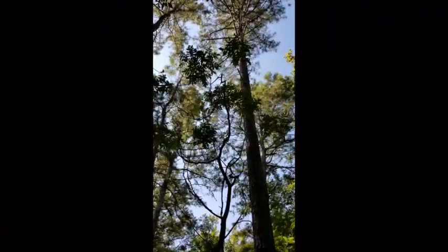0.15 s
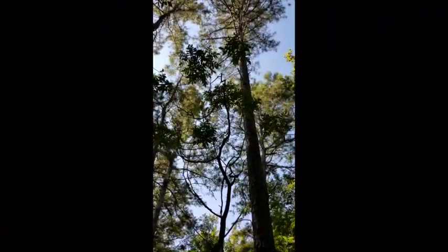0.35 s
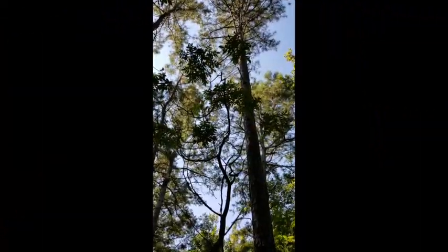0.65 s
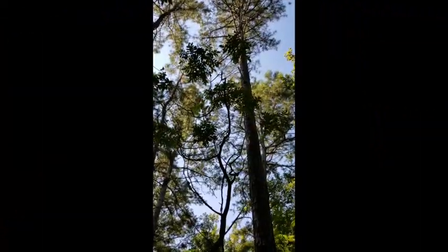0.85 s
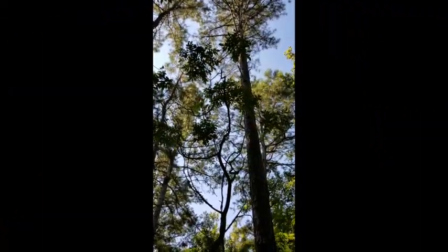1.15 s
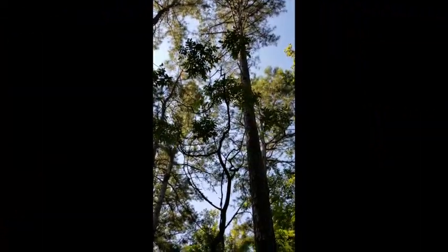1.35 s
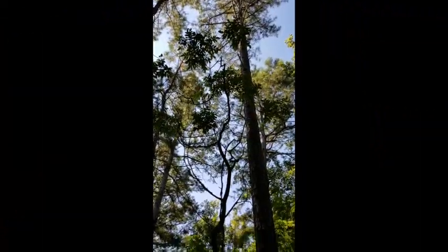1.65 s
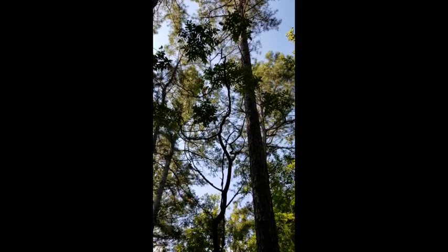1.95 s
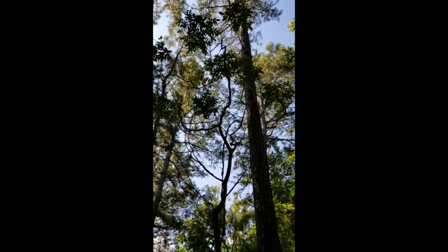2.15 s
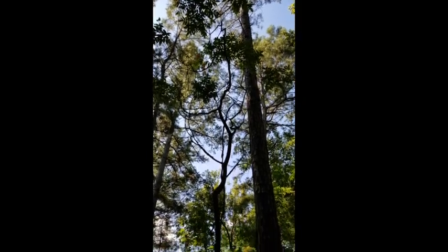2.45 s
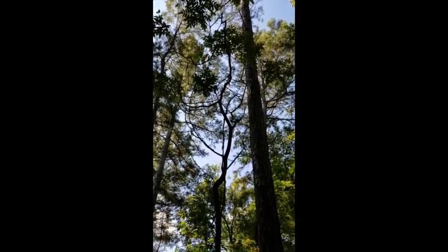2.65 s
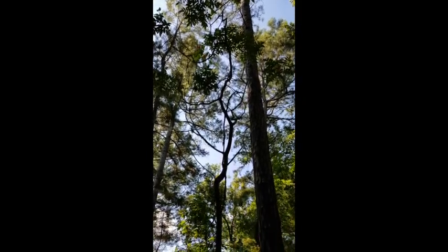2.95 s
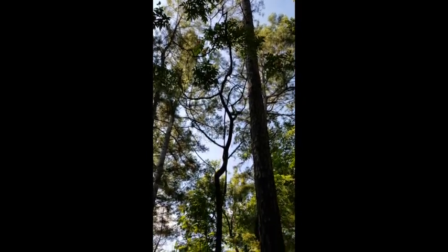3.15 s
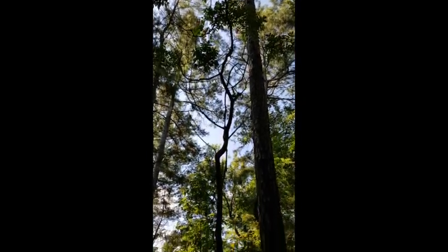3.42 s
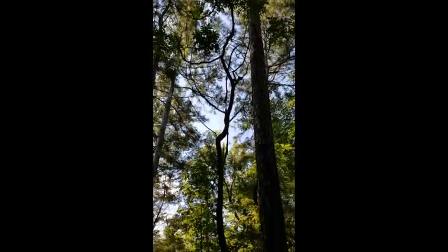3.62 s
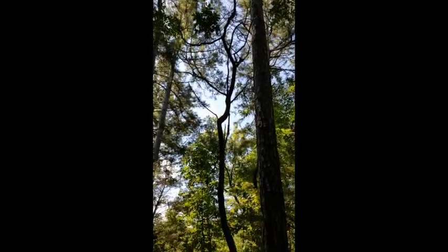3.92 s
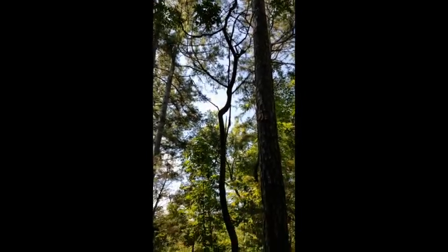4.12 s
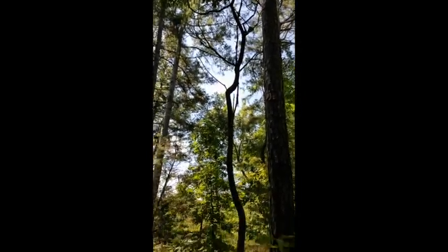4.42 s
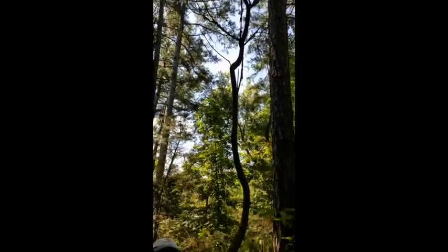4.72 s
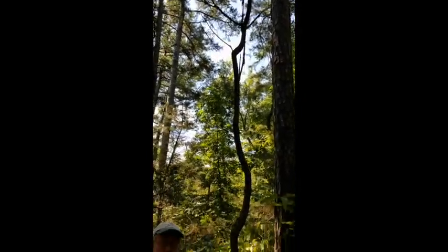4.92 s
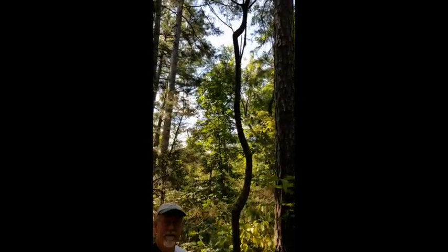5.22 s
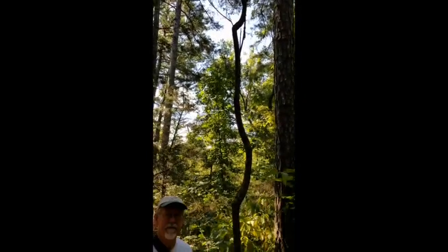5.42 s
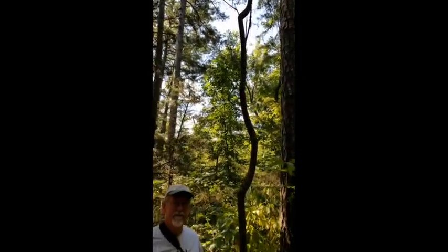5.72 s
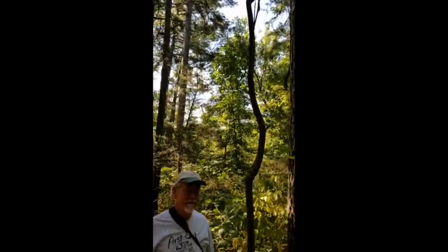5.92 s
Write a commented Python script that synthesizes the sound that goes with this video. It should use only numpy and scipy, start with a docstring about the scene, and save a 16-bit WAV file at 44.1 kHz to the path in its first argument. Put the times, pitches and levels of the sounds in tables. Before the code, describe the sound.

A steady wall of insects fills a summer wood for about 6 seconds. Many crickets trill around 6.5 kHz, with individual fast pulsing trains swelling and fading; katydids add a smooth, brighter hiss above 9 kHz, stronger on the left, with rapid buzzing pulses around 2.5 s. A faint, wavering cicada drone on the right stops abruptly at 1.25 s. The hand holding the microphone makes small dry ticks from 0.3 to 0.7 s, with the heaviest dull thud at 0.56 s on the right, more ticks at 1.0 s and a faint cluster near 3.0 s. Distant, blurred birds call very softly around 0.7, 1.9, 2.1, 2.7 and 4.3 s. Quiet woodland air, slight breeze and low rumble surges lie underneath, one surge at 4.1 s. From 5.6 s the grip rustles with ticks and soft thuds, ending in tiny crisp snaps near 5.95 s. A man appears late but no speech sounds.

```python
"""A crowd of crickets trills near 6.5 kHz and katydids hiss above 9 kHz, single singers pulsing among them, in a summer wood.
Crowds are noise through wing resonances; near crickets are trains of short notes, single katydids pulsed noise.
A far cicada (wavering noise band) stops after 1.2 s; far birds call as blurred gliding tones.
A hand on the microphone case adds ticks, snaps and thuds (dying rings), the heaviest thud near 0.56 s,
and a rustle of the grip in the last half second. Air, breeze and a low rumble surging at jolts are coloured noise."""
import sys
import numpy as np
from scipy import signal
from scipy.fft import rfft, irfft, next_fast_len
from scipy.io import wavfile

SR = 44100
rng = np.random.default_rng(int(sys.argv[2]) if len(sys.argv) > 2 else 0)


def wav_out(sig):
    """Save sig, one row per channel (or a flat mono array), as 16-bit PCM at SR to the path in sys.argv[1]."""
    wavfile.write(sys.argv[1], SR, np.round(np.clip(np.atleast_2d(sig).T, -1, 1) * 32767).astype(np.int16))


N = 267466


def amp(db):
    """dB to gain."""
    return 10 ** (np.asarray(db) / 20)


def rms_one(x):
    """Scale to rms 1 over all its values."""
    return x / np.sqrt(np.mean(x ** 2) + 1e-20)


def in_time(rows):
    """Gain, then any further columns, one value per sample; silent outside the table."""
    s, level_db, *rest = np.transpose(rows)
    t = np.arange(N) / SR
    gain = amp(np.interp(t, s, level_db, left=-150, right=-150))
    return [gain] + [np.interp(t, s, column) for column in rest]


def panned(pan_db):
    """Left and right gains for an L-R difference in dB; total power stays fixed."""
    ratio = amp(np.atleast_1d(pan_db))
    return 2 * np.array([ratio, np.ones_like(ratio)]) / np.sqrt(1 + ratio ** 2)


def stereo_noise():
    """White noise, independent left and right."""
    return rng.standard_normal((2, N))


def coloured(x, spectrum, side=((1, 0), (2, 0))):
    """Filter two channels, tilted between the ears by frequency; their powers are equal and sum to 1."""
    size = next_fast_len(N)
    log_hz = np.log(np.arange(size // 2 + 1) * SR / size + 1e-9)

    def curve_db(rows, **ends):
        hz, db = np.transpose(rows)
        return np.interp(log_hz, np.log(hz), db, **ends)

    tilt_db = curve_db(side) * [[.5], [-.5]]
    gain = amp(curve_db(spectrum, left=-150, right=-150) + tilt_db)
    filtered = irfft(rfft(x, size) * gain, size)[:, :N]
    return np.array([rms_one(channel) for channel in filtered]) / np.sqrt(2)


def drift(corner_hz):
    """Slow chance: noise twice through a one-pole low-pass, spread 1."""
    step = 40   # samples between slow values
    r = np.exp(-2 * np.pi * corner_hz * step / SR)
    slow = signal.lfilter([1], [1, -2 * r, r * r], rng.standard_normal(N // step + 2002))
    slow = rms_one(slow[2000:])   # drop the filter's start
    return np.interp(np.arange(N) / step, np.arange(len(slow)), slow)


def swell(peak_s, peak_db, rise_db_per_s, fall_db_per_s):
    """Gain that climbs to a peak and sinks again, both at a steady rate in dB."""
    late_s = np.arange(N) / SR - peak_s
    return amp(peak_db + np.minimum(rise_db_per_s * late_s, -fall_db_per_s * late_s))


def chorus(rows, wings, side, strokes, sharp, flicker_db):
    """Countless file-tooth impacts blend to noise in the wing resonance; the nearest singers make it throb."""
    level, pan_db = in_time(rows)
    throb_db = np.array([flicker_db * drift(35), flicker_db * drift(24)])
    for per_s, wander, left_db, right_db in strokes:
        pace = per_s * (1 + wander * drift(2.1))
        turn = 2 * np.pi * (np.cumsum(pace) / SR + rng.random())
        stroke = np.cos(turn) + sharp * np.cos(2 * turn)   # a stroke is shorter than its pause
        come_and_go = amp(5.2 * drift(1.0))
        throb_db += np.array([[left_db], [right_db]]) * stroke * come_and_go
    teeth = stereo_noise() * amp(throb_db)
    return level * panned(pan_db) * coloured(teeth, wings, side)


# Cricket crowd level. Each row: time in seconds, level in dB, L-R in dB.
CRICKET_LEVEL = [(0, -44, -2), (1, -42.5, -2), (2.2, -43.5, -2), (2.8, -43, -2), (3.1, -44, -1),
                 (4, -43.5, -1), (5, -44, -0.8), (6.07, -43.5, 4)]
# Cricket wing resonance. Each row: frequency in Hz, relative density in dB per Hz.
CRICKET_WINGS = [(5250, -81), (5500, -24.5), (5800, -9), (6050, -2.5), (6250, 3), (6400, 2), (6560, 2.5),
                 (6800, 1), (6900, -1.5), (6980, -1), (7150, -3), (7300, -9), (7420, -7.5), (7550, -11.5),
                 (8000, -10), (8230, -23), (8500, -56)]
# Uneven spread of pitches between the ears. Each row: frequency in Hz, extra L-R in dB.
CRICKET_SIDE = [(5500, 3), (6000, 1.2), (6300, -2), (6800, -3.5), (7050, 4.5), (7400, 2), (8000, 2.5)]
# Faint common throb. Each row: strokes per s, wander as a fraction, depth left in dB, depth right in dB.
CRICKET_STROKES = [(15.4, 0.01, 0.03, 0.25), (30.6, 0.01, 0.2, 0.08)]


def cricket_crowd():
    """The far crowd: tooth-impact noise in the wing resonance."""
    return chorus(CRICKET_LEVEL, CRICKET_WINGS, CRICKET_SIDE, CRICKET_STROKES, sharp=0.093, flicker_db=1.0)


STROKE_SAG_HZ, STROKE_SPREAD_DB = 60.4, 0.5


def cricket(hz, per_s, turn, share, pan_db):
    """Each wing stroke is a short pure note whose pitch sags; strokes come at a steady pace."""
    length = int(share / per_s * SR)
    u = np.arange(length) / length
    centres_s = (np.arange(1, int(per_s * N / SR) + 2) - turn % 1) / per_s
    starts = (centres_s * SR).astype(int) + SR - length // 2   # after 1 s of padding
    phase_chance = rng.standard_normal((len(starts), 2))
    loud_chance = rng.standard_normal((len(starts), 1))
    turns = (hz * u + STROKE_SAG_HZ * (u - u * u) / 2) * length / SR
    out = np.zeros((2, N + 2 * SR))
    for ear in (0, 1):
        note = np.sin(2 * np.pi * (turns + phase_chance[:, [ear]])) * np.sin(np.pi * u) ** 2
        out[ear, starts[:, None] + np.arange(length)] = note * amp(STROKE_SPREAD_DB * loud_chance)
    return panned(pan_db) * rms_one(out[:, SR:SR + N]) / np.sqrt(2)


NEAR_COUNT, NEAR_HZ, NEAR_SPREAD_HZ = 30, 6514, 124.6
NEAR_SLOWEST_PER_S, NEAR_FASTEST_PER_S = 14.6, 16.4   # before doubling
NEAR_RE_CROWD_DB, NEAR_SPAN_DB = -2.5, 8.5


def near_crickets():
    """A few dozen singers, each with its own pitch, pace, place and loudness; some stroke twice as fast."""
    out = np.zeros((2, N))
    for pitch, speed, turn, place, loud, kind in rng.random((NEAR_COUNT, 6)):
        hz = NEAR_HZ + NEAR_SPREAD_HZ * np.log((pitch + .05) / (1.05 - pitch))
        pace = 2 if kind > .6 else 1
        per_s = pace * (NEAR_SLOWEST_PER_S + (NEAR_FASTEST_PER_S - NEAR_SLOWEST_PER_S) * speed)
        voice = cricket(hz, per_s, turn, share=.2 * (1 + pace), pan_db=20 * (place - .5))
        out += amp(NEAR_SPAN_DB * loud) * voice
    return rms_one(out) * amp(NEAR_RE_CROWD_DB) * in_time(CRICKET_LEVEL)[0]


# Crickets that stand out. Each row pairs a voice: wing pitch in Hz, strokes per s, turn at start in cycles,
# sounding share of a turn, L-R in dB; with a swell: peak in seconds, level in dB, rise and fall in dB per s.
SOLO_CRICKETS = [((7190, 15.035, -.2, .3, -4), (4.3, -58.5, .4, 6)), ((7400, 41.43, -.88, .55, 12),
                 (5.1, -60.5, 1.3, 3)), ((6260, 15.74, -.05, .3, -9), (2.5, -55.5, 1, 1.5)),
                 ((6370, 30.46, .2, .45, -9), (1.6, -55.5, 3, 1.5)), ((6630, 15.38, .13, .3, -10),
                 (3.4, -55, 1.5, 2)), ((6390, 30.7, -.08, .45, 9), (4.5, -56, 1, 2))]


def solo_crickets():
    """Single trains of wing notes, each swelling and fading once."""
    return sum(swell(*loudness) * cricket(*voice) for voice, loudness in SOLO_CRICKETS)


# Katydid crowd level. Each row: time in seconds, level in dB, L-R in dB.
KATYDID_LEVEL = [(0, -41.5, 8.6), (.5, -42.5, 8.9), (1.3, -41, 7.4), (2, -42.5, 8.8), (2.7, -41, 8.4),
                 (3.3, -43, 8.3), (3.9, -42, 9.3), (5, -43.5, 9.7), (6.07, -43, 8.3)]
# Katydid wing resonance. Each row: frequency in Hz, relative density in dB per Hz.
KATYDID_WINGS = [(8500, -85), (8900, -61), (9100, -24.5), (9800, -13.5), (11300, -9.5), (12900, -2),
                 (14800, 1.5), (15700, 0), (16500, -8.5)]
# Uneven spread of pitches between the ears. Each row: frequency in Hz, extra L-R in dB.
KATYDID_SIDE = [(9000, -8), (10000, -6.5), (11000, -4), (12200, 0), (14500, 2), (15700, 3)]
# Faint common throb. Each row: strokes per s, wander as a fraction, depth left in dB, depth right in dB.
KATYDID_STROKES = [(26.0, 0.02, 0.25, 0.25), (17.6, 0.051, 0.08, 0.08)]


def katydid_crowd():
    """A hiss: tooth-impact noise in a broad, high wing resonance."""
    return chorus(KATYDID_LEVEL, KATYDID_WINGS, KATYDID_SIDE, KATYDID_STROKES, sharp=0.26, flicker_db=0.8)


# Katydids that stand out. Each row pairs a voice: wing pitch in Hz, width in Hz, strokes per s, turn at start
# in cycles, sounding share of a turn, L-R in dB; with a swell: peak in seconds, level in dB, rise and fall in dB per s.
SOLO_KATYDIDS = [((9900, 700, 58.57, .3, .45, 12), (1.3, -67, 5, 35)), ((13900, 2600, 26.09, -.4, .4, 12),
                 (2.5, -52.5, 1.5, 9)), ((14600, 1800, 36.42, 0, .45, 14), (2.8, -56, 5.5, 8))]


def solo_katydids():
    """Each wing stroke is a short burst of tooth impacts in one wing resonance, at a steady pace."""
    t, out = np.arange(N) / SR, np.zeros((2, N))
    for (hz, width_hz, per_s, turn, share, pan_db), loudness in SOLO_KATYDIDS:
        away = np.abs((per_s * t + turn + .5) % 1 - .5)   # turns from the middle of the nearest stroke
        stroke = np.cos(np.pi * np.minimum(away / share, .5)) ** 2
        wing = [(hz - width_hz, -40), (hz - width_hz / 2, -3), (hz, 0),
                (hz + width_hz / 2, -3), (hz + width_hz, -40)]
        buzz = coloured(stereo_noise(), wing) * rms_one(stroke)
        out += swell(*loudness) * panned(pan_db) * buzz
    return out


EDGE_HZ, EDGE_T60_S = 1400, .004   # higher mode of the case


def blows(rows, cycles, sag, tail_db, tail_s, edge_db=-99):
    """A ring swells within a cycle, sags in pitch and dies 60 dB in `cycles`; edge mode and gritty tail join it."""
    out, t = np.zeros((2, N)), np.arange(SR // 5) / SR
    for start, peak_db, hz, pan_db in rows:
        turn = hz * (t + sag * 0.0044 * (1 - np.exp(-t / 0.0027)))
        ring = np.sin(2 * np.pi * turn) * (1 - np.exp(-2 * turn)) * amp(-60 * t * hz / cycles)
        edge = np.sin(2 * np.pi * EDGE_HZ * t) * (1 - np.exp(-EDGE_HZ * t)) ** 2 * amp(-60 * t / EDGE_T60_S)
        ring += amp(edge_db) * edge
        band_hz = [hz * .6, min(hz * 1.4, SR * .45)]
        band = signal.butter(2, band_hz, "band", fs=SR, output="sos")
        grit = rms_one(signal.sosfilt(band, rng.standard_normal((2, len(t)))))
        blow = ring / np.abs(ring).max() + amp(tail_db - 60 * t / tail_s) * grit
        i = int(start * SR)
        out[:, i:i + len(t)] += (amp(peak_db) * panned(pan_db) * blow)[:, :N - i]
    return out


# Finger ticks on the case. Each row: start in seconds, ring peak in dB before panning, centre in Hz, L-R in dB.
TICKS = [(.3055, -52, 770, -17), (.321, -60, 577, -17), (.4685, -51.5, 830, -17), (.544, -53, 754, -24),
         (.5588, -41, 496, -35), (.5618, -48, 1010, -28), (.5897, -44, 810, -31), (.6045, -53.5, 447, -21),
         (.664, -55, 845, -20), (1.0016, -52.5, 1000, -23), (1.012, -50.5, 686, -23),
         (1.0343, -46.5, 854, -28), (1.2355, -60, 765, -15), (1.9655, -55, 1040, 0),
         (2.9245, -58, 560, -19), (2.9385, -52, 537, -15), (2.957, -70, 620, -18), (2.97, -62, 540, -18),
         (2.989, -61, 540, -18), (3.0225, -63, 600, -20), (3.0277, -55.5, 570, -22),
         (3.0533, -62.5, 540, -19), (5.5945, -66, 322, -10), (5.7055, -54, 296, -12),
         (5.7525, -59, 286, -15), (5.7535, -48.5, 930, -13), (5.818, -58, 397, -8), (5.836, -58, 350, -13),
         (5.866, -59, 604, -16), (5.878, -57, 500, -10), (5.893, -64, 500, -17), (5.909, -59, 350, -6),
         (5.928, -72, 317, -7)]


def finger_ticks():
    """Short case rings with a bright edge and a gritty tail; polarity inverted."""
    return -blows(TICKS, cycles=3.8, sag=0.0041, tail_db=-18.5, tail_s=0.21, edge_db=-9.0)


# Twig-like snaps. Each row: start in seconds, ring peak in dB before panning, centre in Hz, L-R in dB.
SNAPS = [(5.9522, -47, 5600, 10), (5.9523, -43, 8600, 4), (5.9548, -52, 4900, 10), (5.9885, -45, 2100, -7),
         (5.9883, -43, 4600, 9)]


def snaps():
    """Bright rings that die in milliseconds; polarity inverted."""
    return -blows(SNAPS, cycles=7, sag=0.0091, tail_db=-21, tail_s=0.1)


# Dull thuds of the whole case. Each row: start in seconds, ring peak in dB before panning, ring in Hz, L-R in dB.
THUDS = [(.5595, -37, 64.6, -24), (5.097, -51, 93, -32), (.04, -50, 77, -17), (1.615, -53.5, 75, -9),
         (5.817, -48, 69.4, -9), (5.864, -47, 72.4, -23), (5.907, -51, 62, -21)]


def case_thuds():
    """Low case rings whose pitch sags strongly at the onset."""
    return blows(THUDS, cycles=6.6, sag=1.0, tail_db=-56, tail_s=.1)


# The grip shifts. Each row: time in seconds, level in dB.
RUSTLE_LEVEL = [(5.57, -85), (5.6, -57), (5.645, -67), (5.665, -74), (5.7, -68), (5.74, -65), (5.765, -57),
                (5.795, -66), (5.834, -60), (5.858, -59), (5.92, -56), (5.95, -61), (5.98, -63),
                (6.07, -66)]
# Rustle spectrum. Each row: frequency in Hz, relative density in dB per Hz.
RUSTLE_COLOUR = [(100, 10.5), (200, 7), (400, -4), (600, -15), (1000, -8), (1800, -14.5), (3000, -36),
                 (5500, -13)]


def grip_rustle():
    """The shifting grip: coloured noise with a fast random flicker."""
    noise = stereo_noise() * amp(1.4 * drift(60))
    return in_time(RUSTLE_LEVEL)[0] * panned(-9) * coloured(noise, RUSTLE_COLOUR)


# Surges of the rumble. Each row: time in seconds, peak in dB.
JOLTS = [(.045, -58.5), (.41, -66), (.62, -68), (.9, -60), (1.62, -65), (2.3, -64), (2.46, -60),
         (2.66, -57), (2.93, -63), (3.24, -69), (3.38, -64.5), (3.75, -65.5), (3.93, -68), (4.14, -54.5),
         (4.58, -67.5), (4.89, -67), (5.0, -62.5), (5.11, -63.5), (5.44, -57.5), (5.68, -59), (5.88, -53)]
# Rumble spectrum. Each row: frequency in Hz, relative density in dB per Hz.
RUMBLE_COLOUR = [(12, -65), (24, -18), (41, -5.5), (65, 6), (81, 2), (172, -17.5), (247, -29), (300, -17),
                 (390, -38), (660, -120)]
RUMBLE_BED_DB, RUMBLE_LUMPY_DB, RUMBLE_LUMP_CORNER_HZ = -68, 2, 2.1
RUMBLE_PAN_DB, RUMBLE_SHARED_POWER = -1.5, 0.69
JOLT_RISE_DB_PER_S, JOLT_FALL_DB_PER_S = 212, 140


def rumble():
    """Lumpy low noise, partly shared by the two microphone ports; it surges when the hand jolts."""
    shared, own = rng.standard_normal(N), stereo_noise()
    noise = np.sqrt(RUMBLE_SHARED_POWER) * shared + np.sqrt(1 - RUMBLE_SHARED_POWER) * own
    level = amp(RUMBLE_BED_DB + RUMBLE_LUMPY_DB * drift(RUMBLE_LUMP_CORNER_HZ))
    level += sum(swell(s, db, JOLT_RISE_DB_PER_S, JOLT_FALL_DB_PER_S) for s, db in JOLTS)
    return level * panned(RUMBLE_PAN_DB) * coloured(noise, RUMBLE_COLOUR)


# Far cicada, breaking off. Each row: time in seconds, level in dB.
CICADA_LEVEL = [(0, -72), (.15, -71), (.3, -72.5), (.5, -70.5), (.65, -68.5), (1.0, -70.5), (1.2, -69.5),
                (1.235, -68), (1.26, -77), (1.28, -90)]
# Drone spectrum. Each row: frequency in Hz, relative density in dB per Hz.
CICADA_BAND = [(3150, -24), (3350, 6), (3520, 8), (3800, 4), (4050, 2), (4300, -5), (4700, -9)]
# Two last clicks. Each row: start in seconds, ring peak in dB before panning, centre in Hz, L-R in dB.
CICADA_CLICKS = [(1.2332, -56, 3650, -20), (1.2368, -58, 3550, -20)]
CICADA_WAVER_DB, CICADA_WAVER_CORNER_HZ = 0.5, 8.8


def cicada():
    """A narrow noise band with a randomly wavering level stops near two short rings."""
    level = in_time(CICADA_LEVEL)[0] * amp(CICADA_WAVER_DB * drift(CICADA_WAVER_CORNER_HZ))
    drone = level * panned(-20.0) * coloured(stereo_noise(), CICADA_BAND)
    return drone + blows(CICADA_CLICKS, cycles=14.0, sag=0.005, tail_db=-30.0, tail_s=0.05)


# Far calls, blurred by the trees. Each row: start in seconds, length in seconds, pitch in Hz at start, middle
# and end, width in Hz, level in dB, L-R in dB.
BIRD_CALLS = [(.735, .055, 2450, 2350, 2300, 120, -72.5, -7), (.74, .12, 2700, 2850, 2800, 400, -73.5, -7),
              (.79, .05, 2500, 2480, 2500, 120, -78, -6), (.85, .11, 2850, 2700, 2750, 400, -79, -7),
              (.69, .08, 4000, 4050, 3950, 300, -75, 10), (2.13, .34, 1500, 1560, 1480, 320, -77.5, 0),
              (2.74, .16, 2800, 2520, 2900, 200, -78, -4), (2.69, .24, 2650, 2850, 2750, 400, -80, -3),
              (1.885, .04, 5780, 5760, 5740, 150, -66, -14), (4.23, .06, 4380, 4350, 4300, 140, -79, 5),
              (4.24, .13, 4750, 4800, 4880, 220, -77.5, 4), (4.3, .14, 4500, 4600, 4650, 320, -74.5, 3),
              (4.33, .14, 4180, 4280, 4330, 160, -77, 3)]
BIRD_FLUTTER_DB, BIRD_FLUTTER_CORNER_HZ = 2, 30


def birds():
    """Each call is a gliding tone whose many echoes scramble it into a narrow band."""
    out = np.zeros((2, N))
    flutter = amp(BIRD_FLUTTER_DB * drift(BIRD_FLUTTER_CORNER_HZ))
    for start, length, hz0, hz1, hz2, width_hz, level_db, pan_db in BIRD_CALLS:
        n, i = int(length * SR), int(start * SR)
        u = np.linspace(0, 1, n)
        turn = 2 * np.pi * np.cumsum(np.interp(u, [0, .5, 1], [hz0, hz1, hz2])) / SR
        low_pass = signal.butter(2, width_hz / 2, fs=SR, output="sos")
        blur = signal.sosfilt(low_pass, rng.standard_normal((4, SR)))[:, -n:]
        call = rms_one(blur[:2] * np.cos(turn) + blur[2:] * np.sin(turn))
        envelope = np.abs(np.sin(np.pi * u)) ** 0.29 * flutter[i:i + n]
        out[:, i:i + n] += amp(level_db) * panned(pan_db) * call * envelope
    return out


# Puffs on the ports. Each row: time in seconds, level in dB.
BREEZE_LEVEL = [(0, -84), (.45, -88), (.65, -67.5), (.85, -93), (1.3, -80), (2.6, -70.5), (3.4, -79),
                (4.14, -72.5), (4.7, -84), (5.6, -93)]
# Breeze spectrum. Each row: frequency in Hz, relative density in dB per Hz.
BREEZE_COLOUR = [(90, -18), (140, 0.5), (300, -6.5), (450, -12), (700, -30)]


def breeze():
    """Puffs of breeze on the microphone ports: low noise with a random flutter."""
    noise = stereo_noise() * amp(1.6 * drift(17))
    return in_time(BREEZE_LEVEL)[0] * panned(-0.57) * coloured(noise, BREEZE_COLOUR)


# Air spectrum. Each row: frequency in Hz, relative density in dB per Hz.
AIR_COLOUR = [(110, -20), (170, -6.5), (460, -9.5), (1200, -12.5), (1800, -12.5), (2800, -15.5),
              (3500, -18.5), (4500, -18), (5300, -20.5), (5800, -37)]
# Slow change of the air. Each row: time in seconds, gain in dB.
AIR_SWELL = [(0, -0.3), (1.5, -0.25), (3.1, -1), (4.1, 0), (5.0, 0), (6.07, -0.5)]
AIR_BASE_DB, AIR_PAN_DB = -70.5, -0.5


def wood_air():
    """Air of the wood: broad faint noise, its level drifting."""
    level = amp(AIR_BASE_DB + 1.25 * drift(4.8)) * in_time(AIR_SWELL)[0]
    return level * panned(AIR_PAN_DB) * coloured(stereo_noise(), AIR_COLOUR)


def scene():
    """Insects, sounds of the hand, far animals and air."""
    crickets = cricket_crowd() + near_crickets() + solo_crickets()
    katydids = katydid_crowd() + solo_katydids()
    hand = finger_ticks() + snaps() + case_thuds() + grip_rustle() + rumble()
    far = cicada() + birds()
    return crickets + katydids + hand + far + breeze() + wood_air()


def record(dry):
    """A steep elliptic low-pass removes the top."""
    cutoff_hz = 15740
    low_pass = signal.ellip(12, .5, 75, cutoff_hz, fs=SR, output="sos")   # 0.5 dB ripple, 75 dB stop
    return signal.sosfilt(low_pass, dry)


dry = scene()
out = record(dry)
wav_out(out)
```